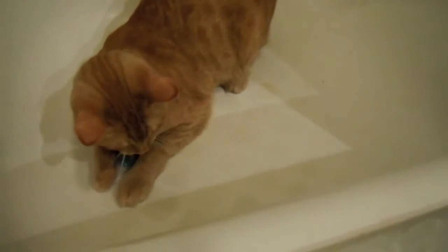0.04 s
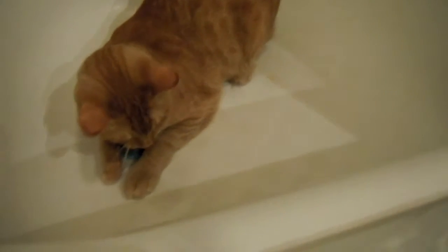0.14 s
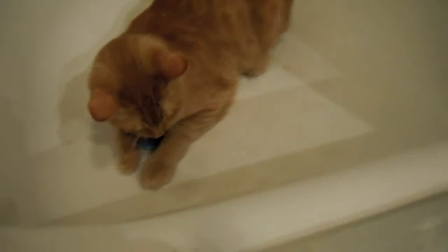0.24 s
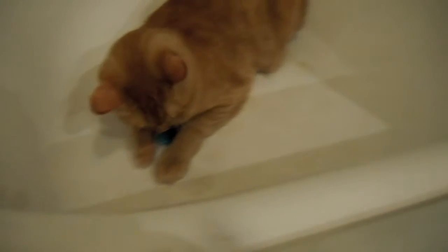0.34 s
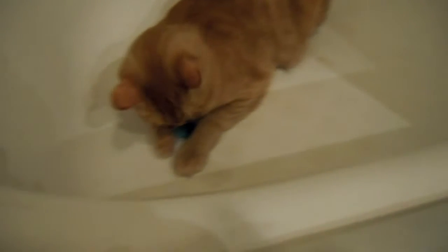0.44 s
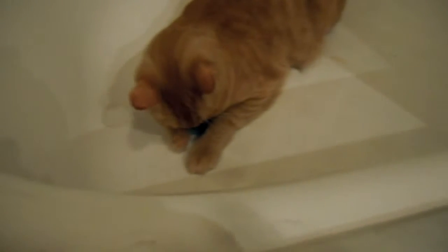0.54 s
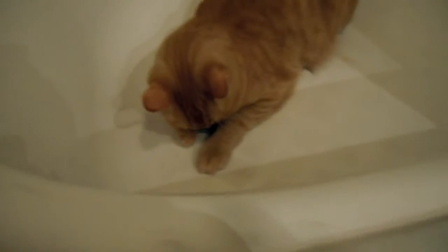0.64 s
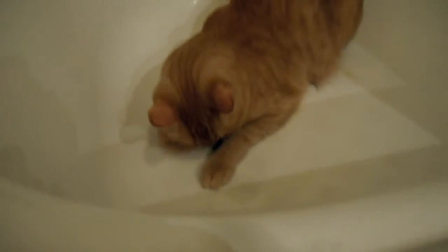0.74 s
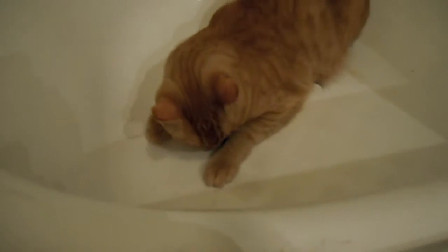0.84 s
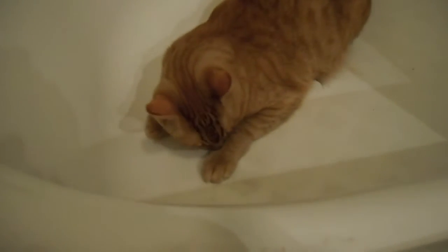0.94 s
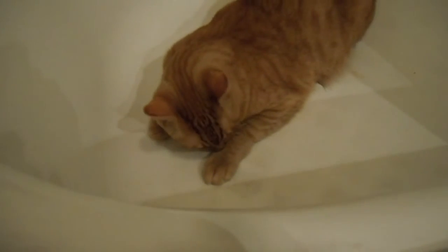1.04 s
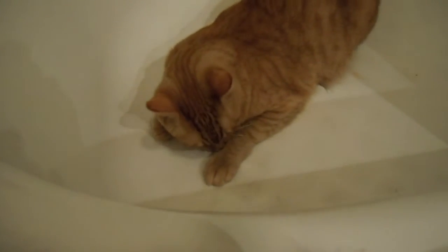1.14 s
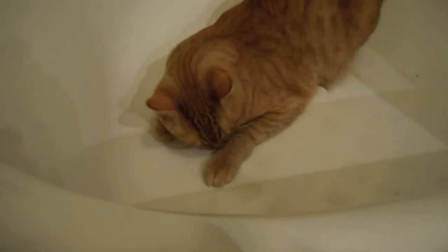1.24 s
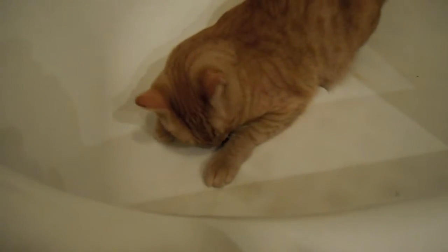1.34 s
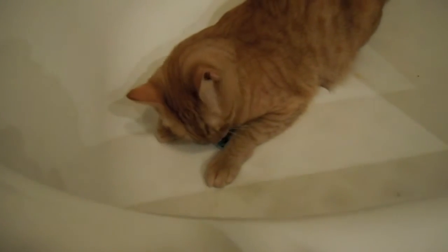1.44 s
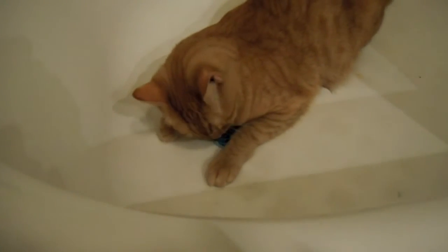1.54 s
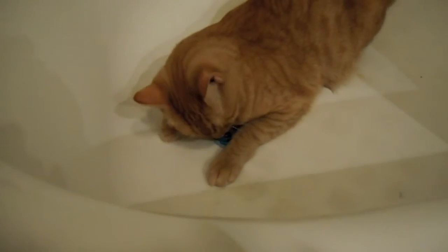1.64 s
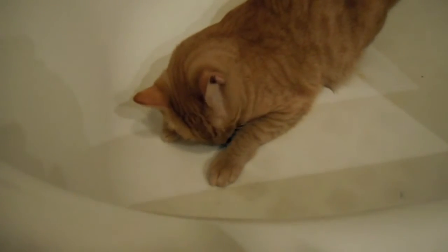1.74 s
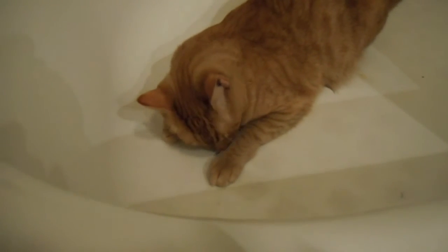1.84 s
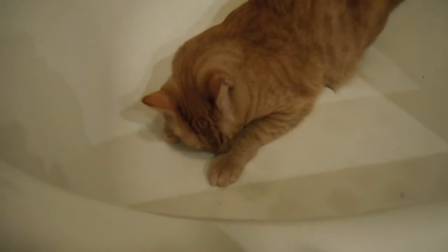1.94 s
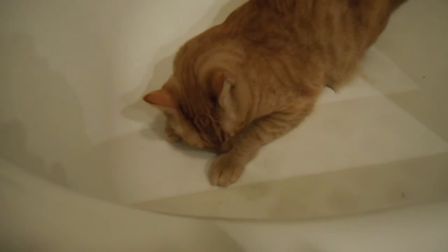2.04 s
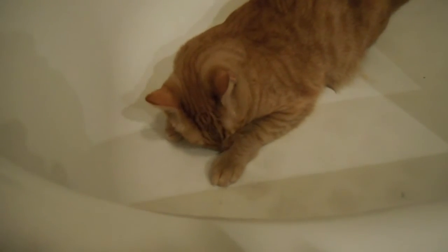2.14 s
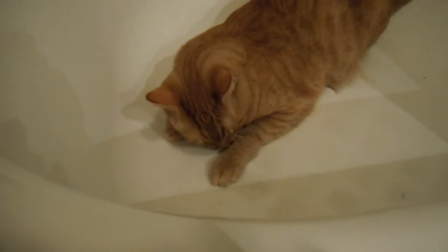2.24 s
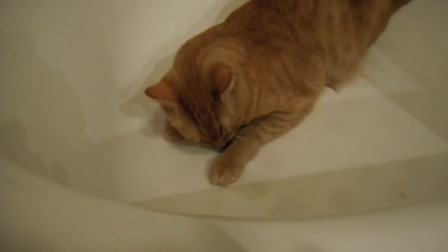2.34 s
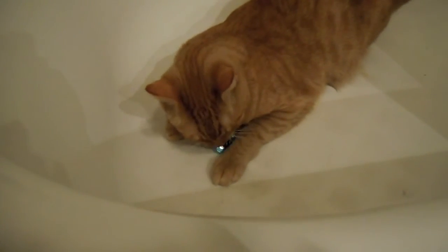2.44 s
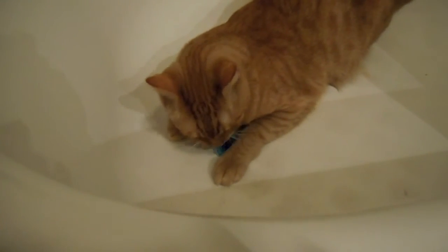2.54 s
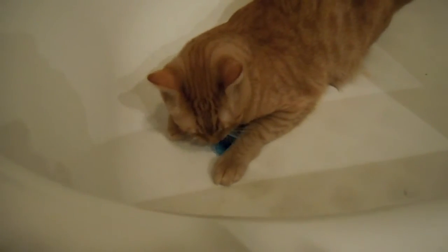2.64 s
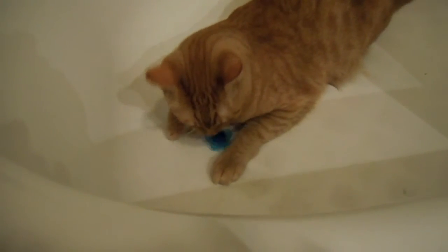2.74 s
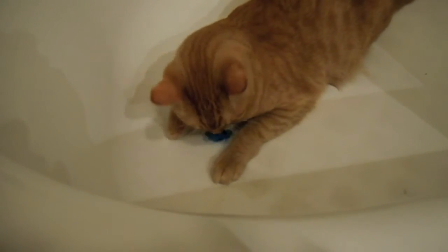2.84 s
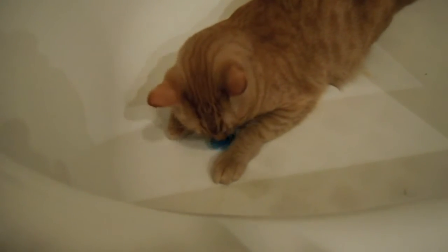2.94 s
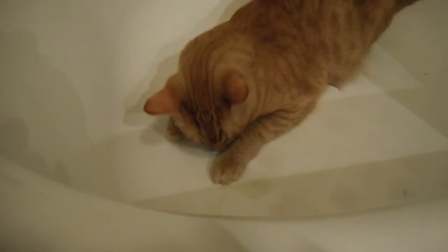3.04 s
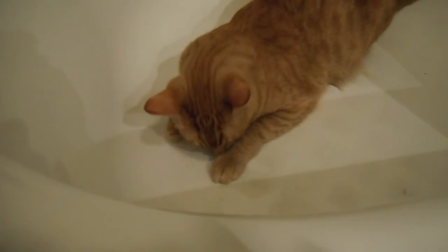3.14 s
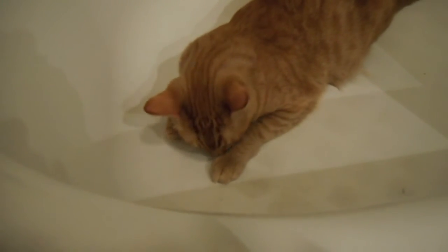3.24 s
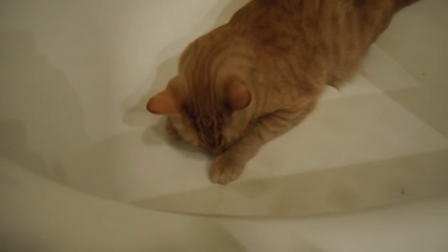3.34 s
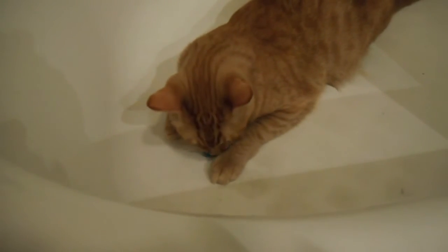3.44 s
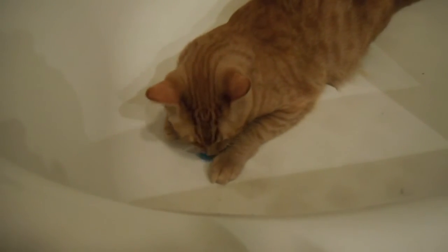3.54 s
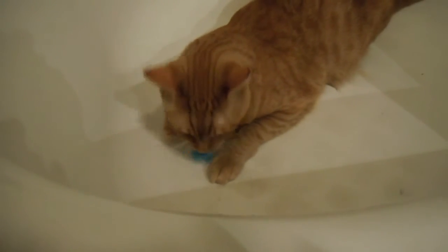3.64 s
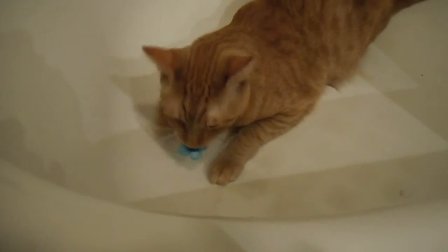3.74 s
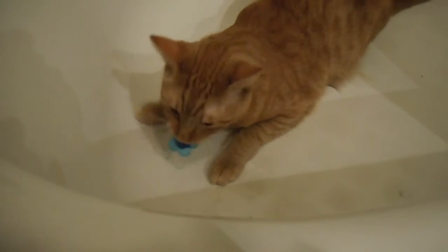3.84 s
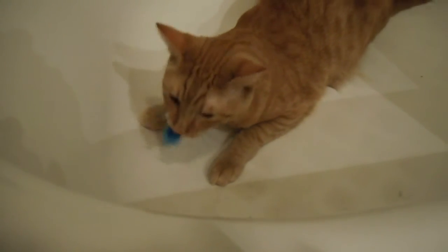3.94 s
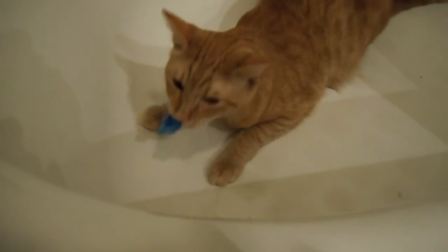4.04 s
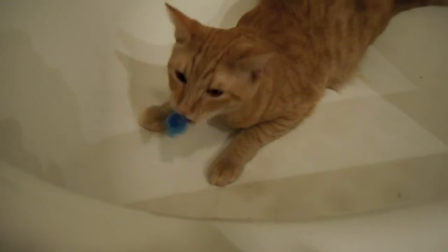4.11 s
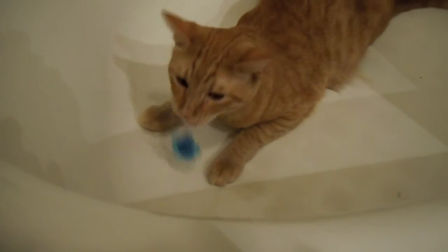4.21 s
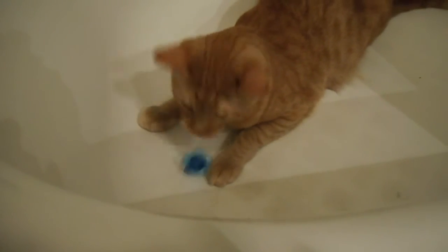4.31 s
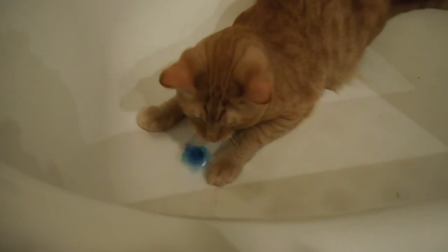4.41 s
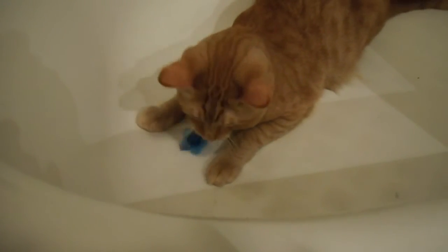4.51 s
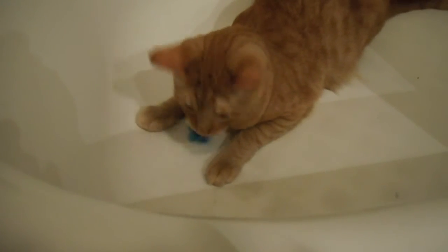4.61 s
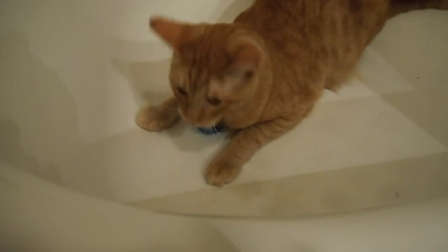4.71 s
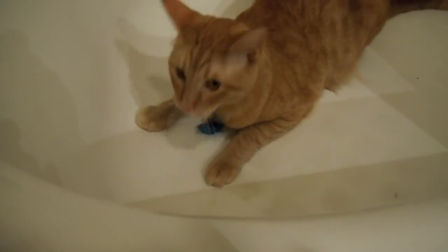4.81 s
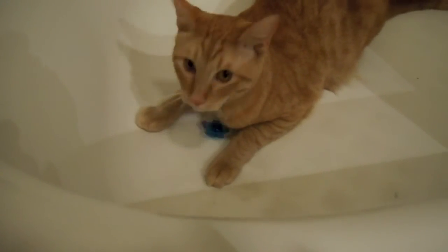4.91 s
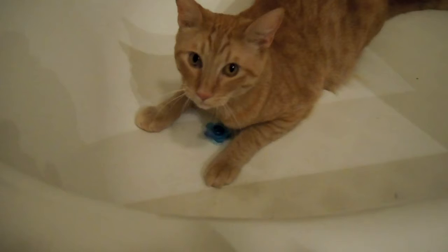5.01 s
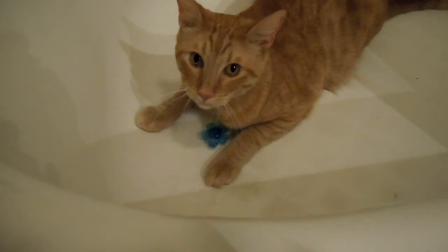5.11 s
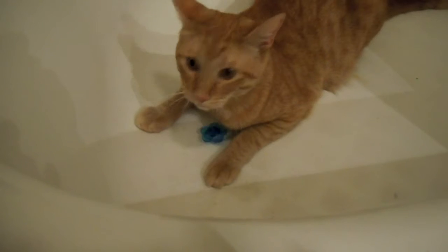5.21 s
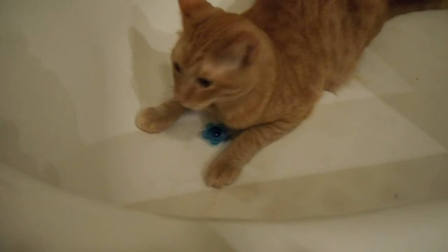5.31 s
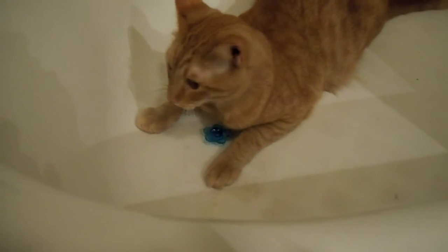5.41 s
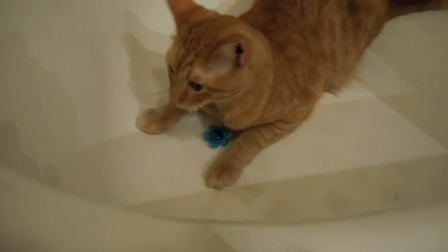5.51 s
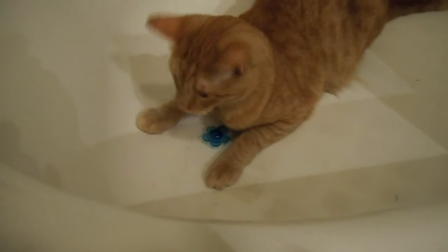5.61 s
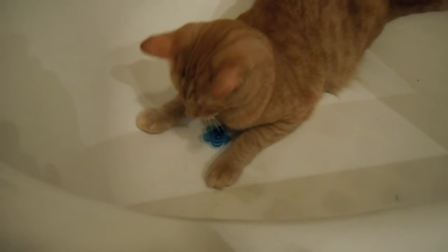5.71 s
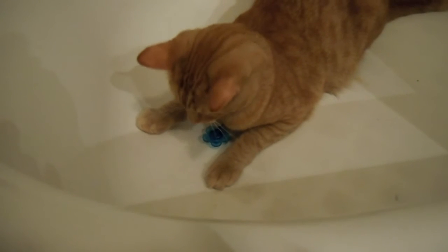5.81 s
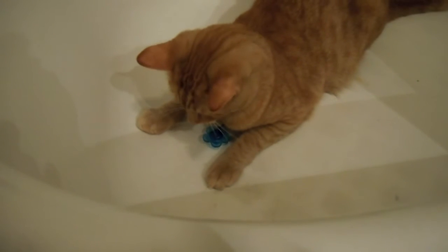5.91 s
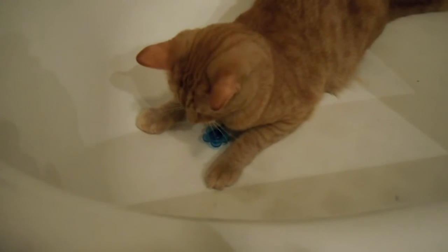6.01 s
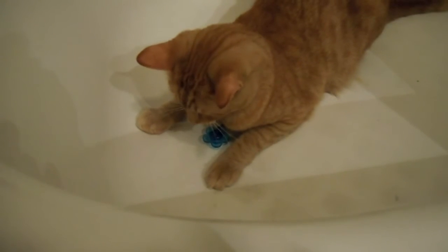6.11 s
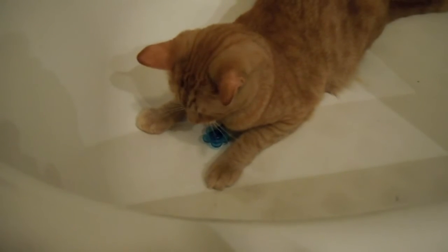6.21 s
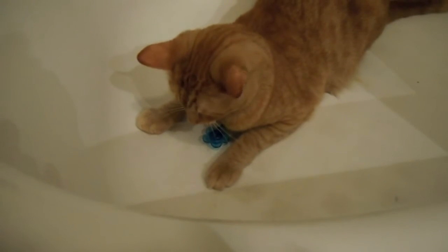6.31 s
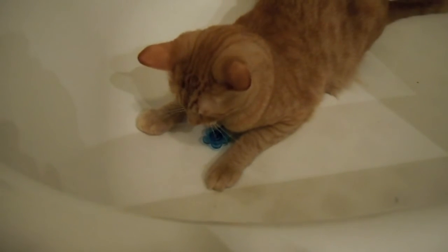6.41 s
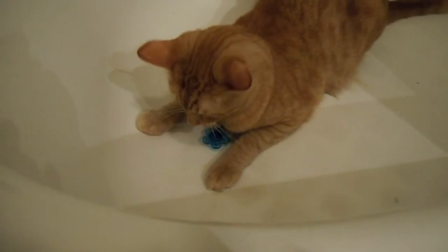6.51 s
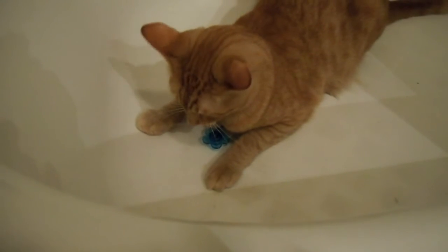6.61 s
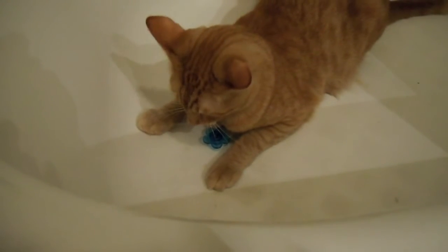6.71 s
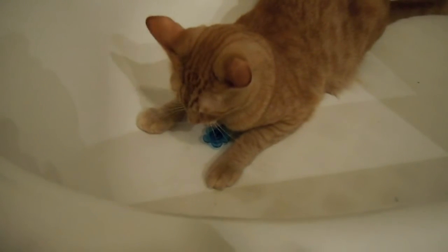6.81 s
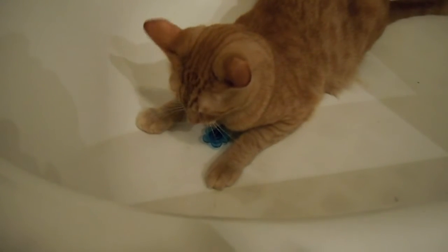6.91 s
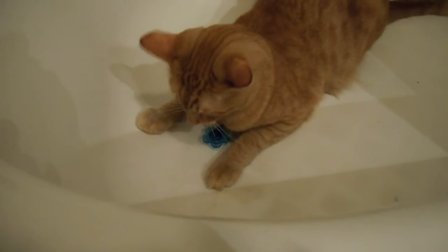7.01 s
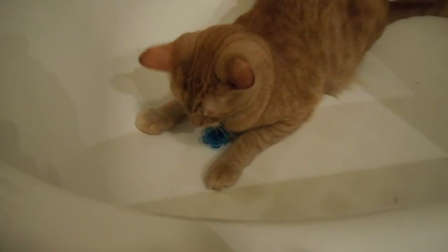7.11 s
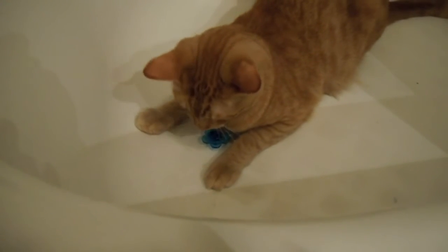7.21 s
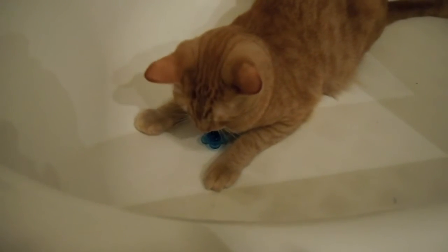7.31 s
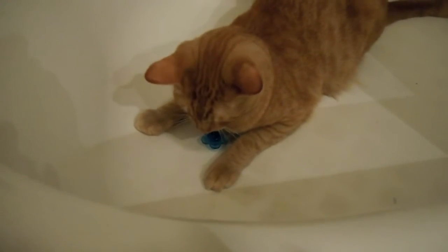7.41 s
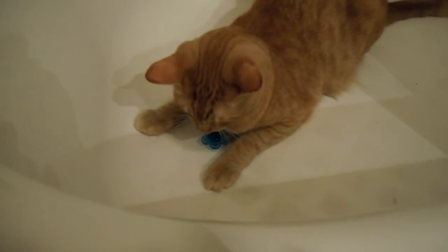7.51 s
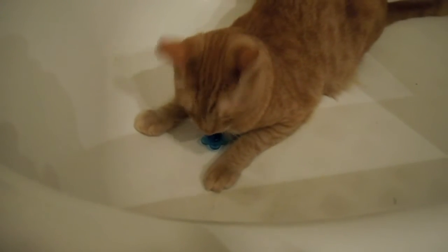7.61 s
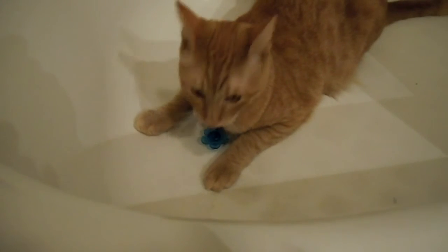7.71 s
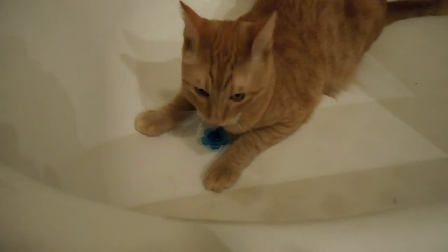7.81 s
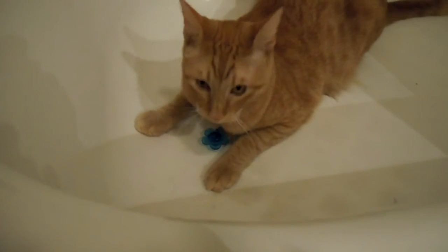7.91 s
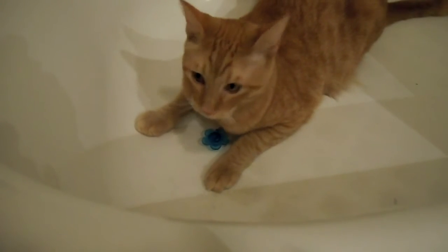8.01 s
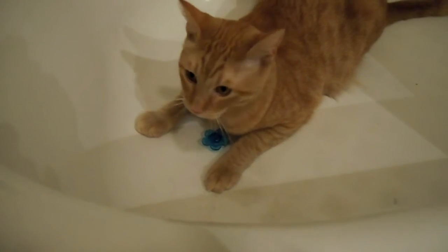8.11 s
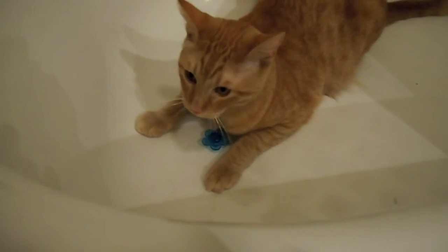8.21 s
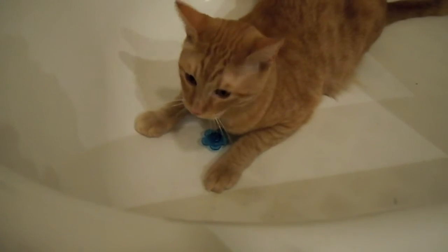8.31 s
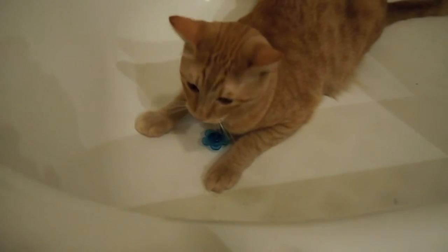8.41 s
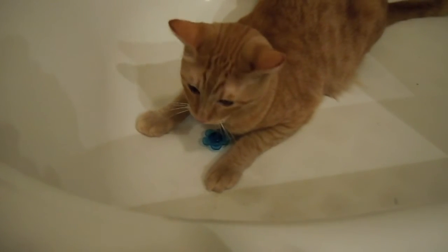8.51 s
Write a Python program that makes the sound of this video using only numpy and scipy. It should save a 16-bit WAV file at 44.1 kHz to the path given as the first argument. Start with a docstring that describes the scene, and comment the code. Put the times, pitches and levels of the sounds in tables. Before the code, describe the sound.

A cat taps a small plastic toy in a bathtub, then it drops with a sharp clack and bounces, over a steady fan hum.

```python
"""A cat plays with a small hollow plastic toy in a bathtub in a tiled bathroom.
From the start a fan motor hums and blows and the camera's electronics whine faintly.
The cat noses and bats the toy: each contact ticks, rings the shell, knocks the tub and echoes.
Soft paw steps come at 3.8 s. At 4.3 s the toy drops: the hardest clack overloads the camera,
which turns its gain down while the toy bounces. The last tap falls at 5.4 s; fan and whine go on."""
import sys
import numpy as np
from scipy import signal
from scipy.io import wavfile
from scipy.ndimage import uniform_filter1d

SR = 44100
rng = np.random.default_rng(int(sys.argv[2]) if len(sys.argv) > 2 else 0)


def materialize(psi):
    """Save the field psi as 16-bit PCM at rate SR to the path in sys.argv[1].

    A 1-D psi becomes a single channel; in a 2-D psi each row is a channel.
    """
    bounded = np.clip(np.atleast_2d(psi).T, -1, 1)
    quanta = np.round(bounded * 32767).astype(np.int16)
    wavfile.write(sys.argv[1], SR, quanta)


N = 377055


def amp(db):
    return 10 ** (np.asarray(db) / 20)


def unit(x):
    """Scale to energy 1."""
    return x / np.linalg.norm(x, axis=-1, keepdims=True)


def curve_at(points, hz):
    """Interpolate (freq_hz, value) rows on a log-frequency axis."""
    freq_hz, value = np.transpose(points)
    return np.interp(np.log(hz + 1), np.log(freq_hz + 1), value)


def add(mix, start_s, sound):
    part = mix[:, max(round(start_s * SR), 0):][:, :sound.shape[1]]
    part += sound[:, :part.shape[1]]


def click(colour):
    """Minimum-phase click from (freq_hz, gain_db) rows."""
    log_gain = curve_at(colour, abs(np.fft.fftfreq(4096, 1 / SR))) * np.log(10) / 20
    spectrum = np.exp(np.conj(signal.hilbert(log_gain)))
    return unit(np.fft.ifft(spectrum).real[:2048])


def stereo_noise(shape, coherence):
    """Complex noise (..., bins, frames) at two microphone ports, partly alike."""
    draws = rng.standard_normal(shape[:-2] + (shape[-1], shape[-2], 4))
    a, b, c, d = np.moveaxis(draws, -1, 0).swapaxes(-1, -2)
    left, independent = a + 1j * b, c + 1j * d
    same = np.clip(curve_at(coherence, np.linspace(0, SR / 2, shape[-2])), -1, 1)[:, None]
    return np.array([left, same * left + np.sqrt(1 - same ** 2) * independent])


def whine(pitch_hz=12857, rms_db=-51.5, left_lead_rad=1.9):
    """Thin steady tone of the camera's electronics."""
    phase = 2 * np.pi * pitch_hz * np.arange(N) / SR
    peak = np.sqrt(2) * amp(rms_db + np.array([[-.7], [.7]]))
    return peak * np.sin([phase + left_lead_rad, phase])


def fan(rush_db=-37, left_lead_rad=0.29):
    """Patchy air rush through duct and room resonances, over the motor hum."""
    air = [(20, -8.5), (85, -9), (190, -13), (300, -4), (550, -11), (1250, -13), (1900, -21), (3500, -21),
           (6000, -24), (8700, -21), (10500, -25), (12500, -32.5), (13100, -37), (13400, -38)]  # rush spectrum: freq_hz, gain_db
    duct = [(156, 28.3, 11.5), (371, 30, 3), (438.4, 23.6, 13.5), (258, 15, 0.5), (1049, 13, 15.5),
            (1110.4, 18, 12.5), (1648, 14, 22.5), (2420, 810, 4)]  # duct and room resonances: freq_hz, width_hz, gain_db
    coherence = [(60, 0.97), (300, 0.99), (700, 0.99), (1500, 0.98), (3000, 0.83), (6000, 0.75),
                 (12000, 0.1)]  # left-right likeness of the rush: freq_hz, coherence
    motor = [(120, -45), (240, -53), (360, -50.5), (480, -61.5), (600, -55), (720, -56), (840, -60.5)]  # multiples of twice the mains rate: freq_hz, rms_db
    frames, hz = N // 512 + 5, np.fft.rfftfreq(2048, 1 / SR)
    resonance_db = sum(db / (1 + (2 * (hz - f) / width_hz) ** 2) for f, width_hz, db in duct)
    colour_db = curve_at(air, hz) + resonance_db
    patches = uniform_filter1d(rng.standard_normal((frames, 1025)), 8, 0)
    patches = uniform_filter1d(patches, 12, 1).T
    patch_db = 1.26 * patches / patches.std()
    spectra = stereo_noise((1025, frames), coherence) * amp(colour_db[:, None] + patch_db)
    rush = signal.istft(spectra, nperseg=2048, noverlap=1536)[1][:, :N]
    t = np.arange(N) / SR
    hum = sum(np.sqrt(2) * amp(db) * np.sin(2 * np.pi * (f * t + rng.random()) + [[left_lead_rad], [0]])
              for f, db in motor)
    return (amp(rush_db) * rush / rush.std() + hum) * amp([[.5], [-.5]])


def paws():
    """Paw steps: low thuds with a soft start."""
    steps = [(3.804, -31, 156), (3.839, -29, 149), (3.888, -38, 178), (3.94, -29, 157), (4.007, -45, 133)]  # footfalls: start_s, level_db, pitch_hz
    out, t = np.zeros((2, N)), np.arange(6000) / SR
    envelope = t / 0.017 * np.exp(1 - t / 0.013)
    for start_s, level_db, pitch_hz in steps:
        add(out, start_s, amp(level_db) * np.sin(2 * np.pi * pitch_hz * t) * envelope * np.ones((2, 1)))
    return out


def echo_tails(count, room_db=-12, delay_s=0.0015, rise_s=0.0054):
    """One stereo tail per toy position: tub decay over a weaker room decay."""
    basin = [(250, 0.12), (1000, 0.41), (3000, 0.28), (9000, 0.29), (13000, 0.19)]  # tub decay: freq_hz, t60_s
    tiles = [(250, 0.57), (1000, 0.4), (4000, 0.23), (9000, 0.15), (13000, 0.23)]  # room decay: freq_hz, t60_s
    coherence = [(300, 0.97), (2000, 1), (4000, 0.97), (8000, 0.64), (13000, 0.27)]  # left-right likeness of the echoes: freq_hz, coherence
    hz, t = np.fft.rfftfreq(256, 1 / SR), np.arange(SR // 128) * 64 / SR
    tub = amp(-60 * t / curve_at(basin, hz)[:, None])
    room = amp(room_db - 60 * t / curve_at(tiles, hz)[:, None])
    spectra = stereo_noise((count, 129, len(t)), coherence) * (tub + room)
    tails = signal.istft(spectra, nperseg=256, noverlap=192)[1]
    tails *= np.clip((np.arange(tails.shape[-1]) / SR - delay_s) / rise_s, 0, 1)
    return (tails / np.linalg.norm(tails, axis=-1).mean()).swapaxes(0, 1)


def shell_ring(t, level_db, spot_turns, scatter, jolts, rise_s=0.00065, rattle_db=3.5, grain_s=0.0036):
    """Three mode groups, each weaker when struck away from its own third of the shell."""
    shell_modes = [(3780, -7.5, 0.047), (3857, -2, 0.033), (6880, -1, 0.023), (7230, -2, 0.02),
                   (7380, -7.5, 0.025), (8990, -18, .01), (9440, -4.5, 0.016), (10100, -12, .008),
                   (10820, -14, 0.015)]  # toy resonances: freq_hz, level_db, t60_s
    edges_hz = [5000, 8200]  # borders of the low, middle and high mode groups: freq_hz
    hz, mode_db, t60_s = np.transpose(shell_modes)[:, :, None]
    group = np.digitize(hz[:, 0], edges_hz)
    detuned_hz = hz * (1 + 0.0047 * scatter[::-1])  # pitch shifts with the way the toy lies
    modes = amp(mode_db + 2.5 * scatter - 60 * t / t60_s) * np.sin(2 * np.pi * detuned_hz * t)
    rings = unit(np.array([modes[group == k].sum(0) for k in range(3)]))
    group_db = level_db - 5 * (1 - np.cos(2 * np.pi * (spot_turns - np.arange(3) / 3)))
    rattle = amp(rattle_db * np.interp(t / grain_s, np.arange(128), jolts))  # the loose shell flutters
    return amp(group_db) @ rings * (1 - np.exp(-t / rise_s)) * rattle


def toy(echo_db=3, shell_send_db=-2.5, panel_direct_db=-5, mode_count=9):
    """Toy meets tub: a tick, a short ring, a thud and knock of the tub, then their echoes."""
    hits = [(0.0014, -12, -5.5, -11, -6, 0.59), (0.0488, -15, -29, -29, -11, .06),
            (0.1546, -22, -17, -31, -16.5, 0.35), (0.3904, -38, -35, -28, -22, .02),
            (1.058, -16, -6.5, -21, -24, 0.76), (2.037, -8, -3, -14, -28, 0.67),
            (2.099, -40, -9, -28, -40, .1), (2.511, -21, -24, -18.5, -21, 0.91),
            (2.7248, -0.5, 1, 4, -0.5, .45), (2.8067, -32, -28, -24, -11, 0.15),
            (2.83, -35, -14, -28, -13, .2), (2.875, -6.5, -28, -17, -5, 0.56),
            (2.8827, -32, -23, -15, -14, 0.14), (2.9671, -23, -14, -28, -27, 0.16),
            (3.107, -22, -26, -23, -15.5, .08), (3.2722, -18, -15, -19, -21, .6),
            (3.2853, -12, -10.5, -25, -21, .4), (3.3293, -40, -12, -25, -35, .66),
            (3.356, -34, -13, -16.5, -35, .33), (3.376, -28, -30, -31, -19, .33),
            (4.112, -29.5, -26, -28, -17.5, 0.48), (4.2918, 34, -3.5, 18.5, 14, 0.092),
            (4.4414, -17.5, 0, 9.5, 12, 0.71), (4.4461, 4, -10, 1.5, 14, 0.61),
            (4.4702, 18, -25, 5, 18, .68), (4.4826, -3, -25, -22, -11, .6), (4.542, 3, -14, -9, 7, 0.59),
            (4.564, -19, 1, -2, 3, 0.62), (4.5982, 13, -6, 2, 15.5, 0.74),
            (4.636, 1.5, -13, -2.5, 10.5, 0.67), (4.699, -1, -4, -8, 6.5, 0.29),
            (4.7345, -20, -2, -9, -10, 0.17), (4.983, -30, -23, -36, -15, 0.27),
            (4.987, -17, -18, -36, -16, .85), (5.0107, -13.5, -31, -30.5, -13, 0.96),
            (5.3587, -24, -27, -30, -20, .1)]  # contacts: start_s, tick_db, thud_db, knock_db, ring_db, spot_turns
    tick_colour = [(4000, -48.5), (6500, -0.5), (8800, 7), (10500, 0.5), (11800, -7), (12800, -2),
                   (13900, -15.5)]  # contact tick: freq_hz, gain_db
    thud_colour = [(150, -51), (350, 6), (520, -6), (750, -2), (1100, -9.5), (1800, -17)]  # tub floor thud: freq_hz, gain_db
    knock_colour = [(450, -21.5), (800, -9), (1500, -4), (2700, -2.5), (3400, -2.5), (4300, -13.5),
                    (6000, -32)]  # tub knock: freq_hz, gain_db
    snap_colour = [(2500, -31), (4300, 15.5), (6000, 15.5), (8000, -4)]  # shell snap: freq_hz, gain_db
    tick, thud, knock, snap = map(click, (tick_colour, thud_colour, knock_colour, snap_colour))
    out, t = np.zeros((2, N)), np.arange(2048) / SR
    scatters = rng.standard_normal((len(hits), mode_count, 1))
    jolt_sets = rng.standard_normal((len(hits), 128))
    for hit, tail, scatter, jolts in zip(hits, echo_tails(len(hits)), scatters, jolt_sets):
        start_s, tick_db, thud_db, knock_db, ring_db, spot_turns = hit
        chatter = unit(jolts * np.exp(-t[:128] / 0.00032))  # a contact is a brief burst of jolts
        contact = amp(tick_db) * np.convolve(tick, chatter)[:2048]
        ring = shell_ring(t, ring_db, spot_turns, scatter, jolts)
        snap_db = -19.5 + 1.29 * tick_db  # only sharp ticks snap the shell
        panel = amp(thud_db) * thud + amp(knock_db) * knock + amp(snap_db) * snap
        direct = contact + ring + amp(panel_direct_db) * panel  # the tub radiates partly off-microphone
        add(out, start_s, direct * amp([[.3], [-.3]]))
        cover_db = -0.25 * max(thud_db - knock_db, 0)  # the cat pressing on the toy shields it
        # The echoed tick arrives from all sides and loses the colour of one contact.
        send = amp(shell_send_db) * (amp(tick_db + cover_db) * tick + ring) + panel
        add(out, start_s, amp(echo_db) * signal.fftconvolve(send[None], tail, axes=1))
    return out


def scene():
    return toy() + paws() + fan() + whine()


def auto_gain_db(x, knee_db=-14, hold_s=0.7, fall_s=0.13, rise_s=0.68, start_db=-3):
    """Gain starts low, slides down after an overload, holds, then creeps back."""
    block, block_s = 441, 0.01
    power = (x[:, :N // block * block] ** 2).mean(0).reshape(-1, block).mean(1)
    level_db = 10 * np.log10(power + 1e-12)
    hold_blocks = round(hold_s / block_s)
    gain_db = [start_db]
    for k in range(len(level_db)):
        held_db = level_db[max(k - hold_blocks, 0):k + 1].max()
        aim_db = -max(held_db - knee_db, 0)
        lag_s = fall_s if aim_db < gain_db[-1] else rise_s
        gain_db.append(aim_db + (gain_db[-1] - aim_db) * np.exp(-block_s / lag_s))
    return np.interp(np.arange(N), np.arange(len(gain_db)) * block, gain_db)


def record(dry, bass_hz=90, cutoff_hz=13950):
    """Gain control that spares the deep bass, hard clipping, band limit."""
    bass = signal.lfilter(*signal.butter(1, bass_hz, fs=SR), dry)
    ducked = bass + (dry - bass) * amp(auto_gain_db(np.clip(dry, -1, 1)))
    lowpass = signal.firwin(511, cutoff_hz, window=("kaiser", 9), fs=SR)
    return signal.oaconvolve(np.clip(ducked, -1, 1), lowpass[None], "same")


dry = scene()
out = record(dry)
materialize(out)
```